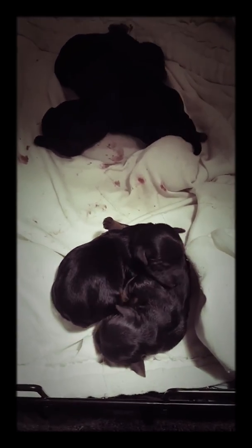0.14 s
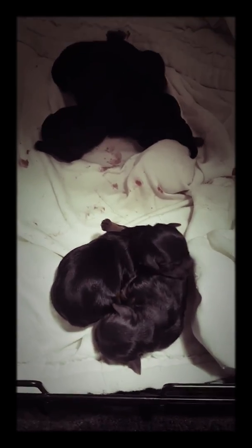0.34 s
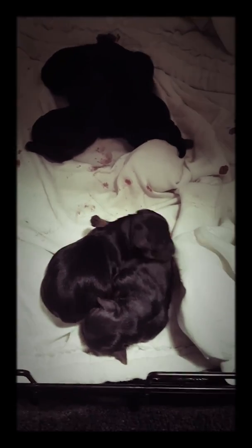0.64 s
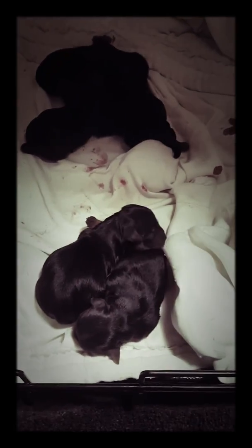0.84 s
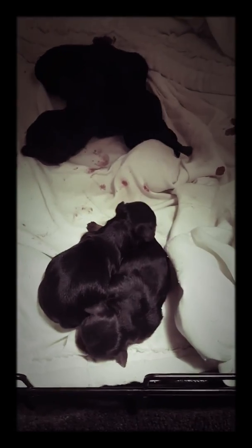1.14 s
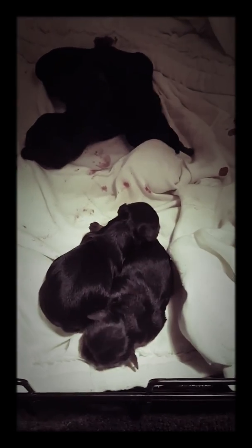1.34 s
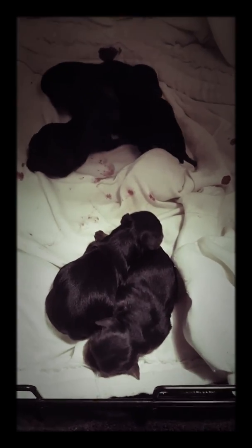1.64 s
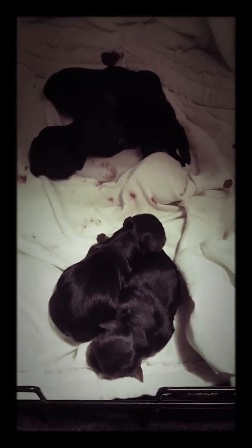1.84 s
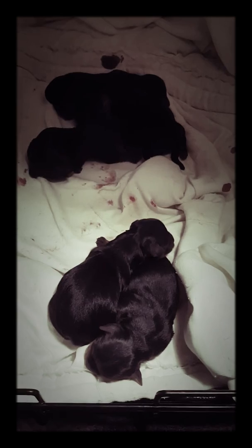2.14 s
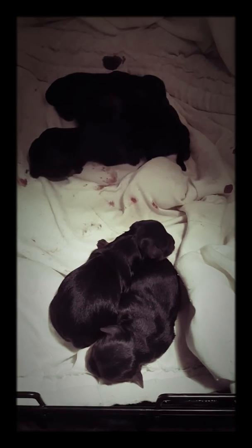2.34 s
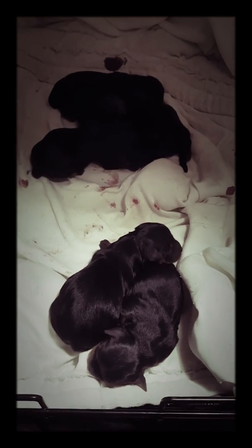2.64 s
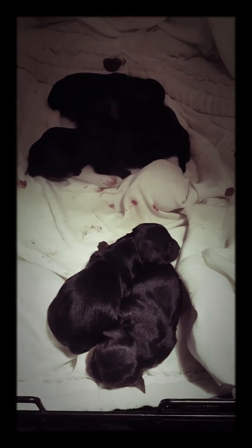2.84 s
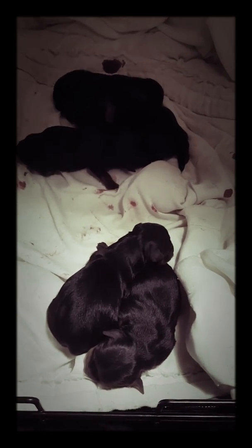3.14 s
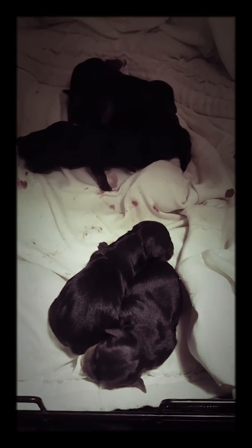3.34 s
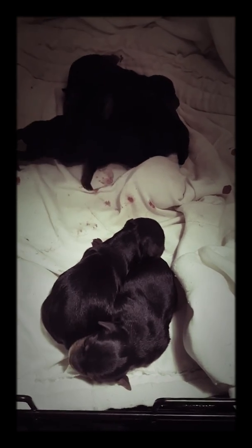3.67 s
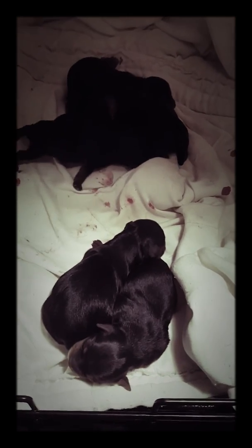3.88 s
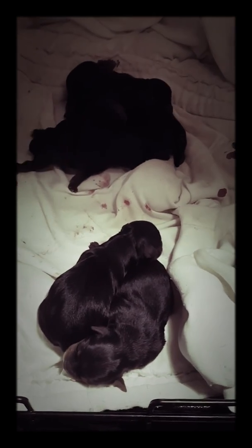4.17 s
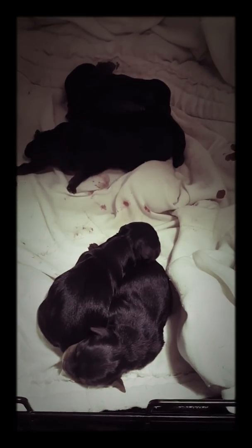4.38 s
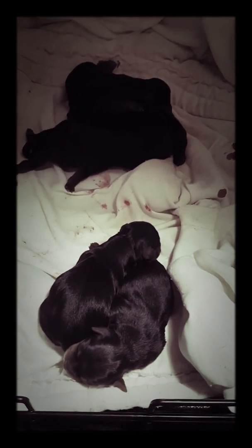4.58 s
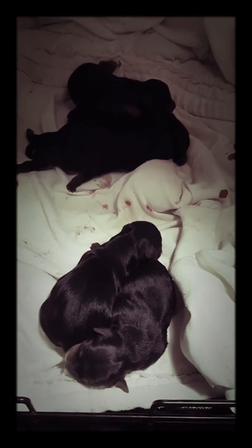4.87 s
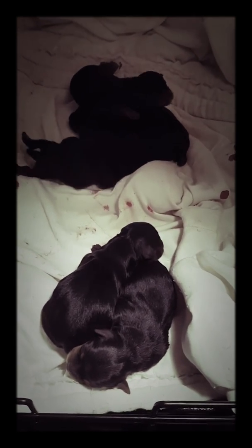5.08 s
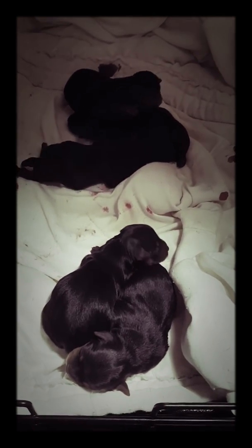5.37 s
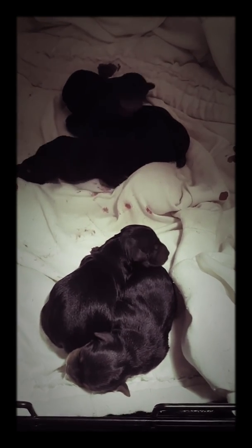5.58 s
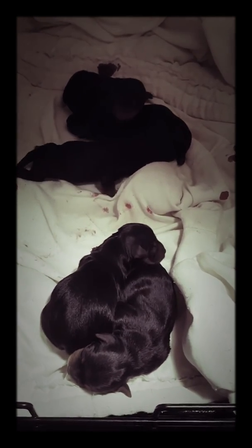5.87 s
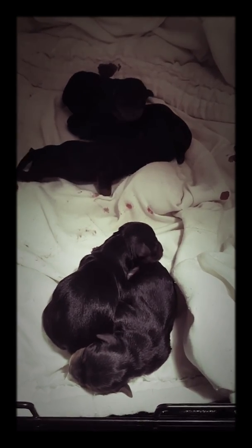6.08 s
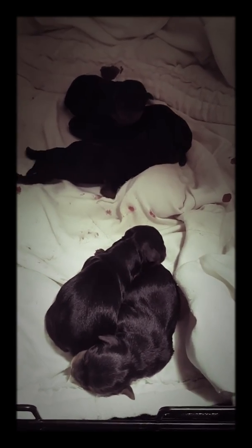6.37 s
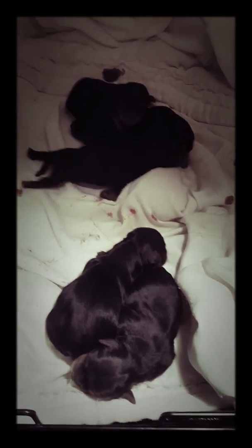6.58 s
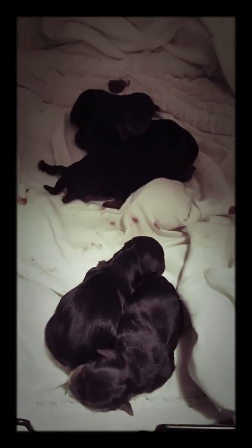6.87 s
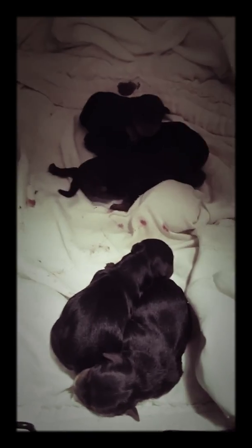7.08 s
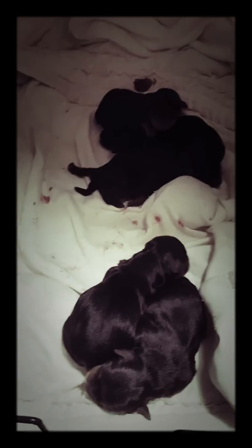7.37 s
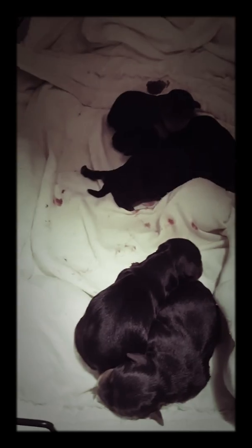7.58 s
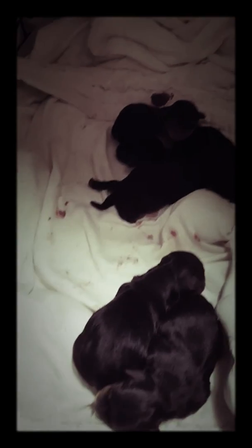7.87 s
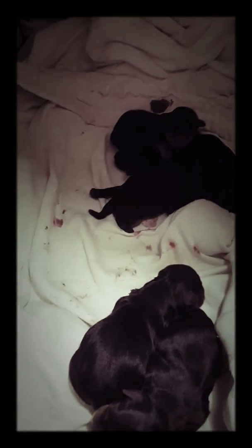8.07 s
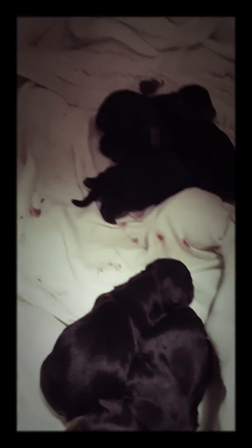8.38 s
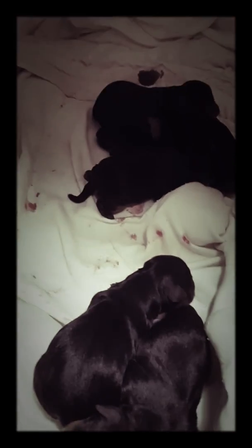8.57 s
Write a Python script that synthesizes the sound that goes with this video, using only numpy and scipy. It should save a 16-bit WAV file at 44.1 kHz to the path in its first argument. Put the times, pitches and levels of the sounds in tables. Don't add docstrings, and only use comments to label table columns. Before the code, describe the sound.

Newborn puppies squeak and whine in short, high, wavering cries that crack and rasp, with small handling bumps over faint hum and hiss.

```python
import sys
import numpy as np
from scipy import signal
from scipy.fft import rfft, irfft
from scipy.io import wavfile
from scipy.ndimage import uniform_filter1d

SR = 44100
rng = np.random.default_rng(int(sys.argv[2]) if len(sys.argv) > 2 else 0)


def store_pcm(level_fs):
    pcm = np.round(np.clip(level_fs, -1, 1) * 32767).astype(np.int16)
    wavfile.write(sys.argv[1], SR, np.atleast_2d(pcm).T)


def ratio_of_db(decibels):
    return 10 ** (np.asarray(decibels, float) / 20)


N = 384552
T = np.arange(N) / SR


def band(x, hz, width):
    return signal.lfilter(*signal.iirpeak(hz, hz / width, SR), x)


def band_twice(x, hz, width):
    return band(band(x, hz, width), hz, 2 * width)


def level(x, db):
    return x * ratio_of_db(db) / np.sqrt(np.mean(x ** 2))


def walk(rate):
    hold = int(SR / rate)
    held = np.repeat(rng.standard_normal(N // hold + 1), hold)
    return uniform_filter1d(held, hold)[:N]


def swells(rows):
    return sum(ratio_of_db(db) * np.exp(-np.maximum((s - T) / rise, (T - s) / fall)) for s, rise, fall, db in rows)


def cry(rows, fall_db, half_db, snap_db, open_db, wobble):
    # frequency in Hz, gain in dB.
    mouth = [(250, -35.5), (550, -5.5), (850, 0), (1200, 3), (1700, 2.5), (2400, -5), (3200, -10),
             (4400, -28)]
    # time in seconds, lift in dB, depth of the dip in dB.
    gape = [(0.4, 8, 1), (0.9, 14, 5.5), (2.3, 15, 1), (4.7, 3, -1.5), (8, 5, 8)]
    pops_s = np.array([2.657, 7.082, 7.768, 8.407])
    pop_lift, pop_settle_s, same_cry_s = 0.373, 0.00282, 0.02
    dip_hz, dip_width_hz = 1920, 200
    edge_s = 0.0011

    s, *columns = np.transpose(rows)
    start, end = s[0], s[-1] + edge_s
    i = slice(int(start * SR), int(end * SR))
    hz, effort = (np.interp(T[i], s, column) for column in columns)

    slew = max(min(300, len(hz) // 4), len(hz) // 32)
    for _ in range(2):
        hz = uniform_filter1d(hz, size=slew, mode="nearest")
    pops = np.abs(np.array(pops_s) - start).min() < same_cry_s
    hz = hz * (1 + pop_lift * np.exp((start - T[i]) / pop_settle_s) * pops)
    uneven = min(ratio_of_db(half_db), 1)
    shake = (0.0081 + 0.059 * uneven) * wobble[0, i]
    phase = 2 * np.pi * np.cumsum(hz * (1 + shake)) / SR

    k = np.arange(1, 18)[:, None]
    khz = k * hz / 1000
    mouth_hz, mouth_db = np.transpose(mouth)
    db = np.clip(fall_db * (k - 1), -24, 4 * abs(fall_db))
    db = db + snap_db * ((k == 2) + 0.11 * (k == 4)) + open_db * (k > 2)
    db = db + np.interp(np.log(k * hz), np.log(mouth_hz), mouth_db)
    at, lift, loss = np.transpose(gape)
    db = db - np.interp(start, at, loss) * np.exp(-((k * hz - dip_hz) / dip_width_hz) ** 2)
    db = db + 2.1 * start * np.exp(-(khz - 6.7) ** 2)
    db = db + (k > 1) * np.interp(start, at, lift) * np.exp(-((khz - 4.4) / 0.62) ** 2)
    db = db - 23 * (np.clip(khz - 4.75, 0, 0.9) + np.maximum(khz - 7.3, 0))
    db = db + effort - 10 * np.log10(np.sum(ratio_of_db(2 * db), axis=0))

    halves = np.maximum(db, np.vstack([db[:1] - 20, db[:-1]])) + half_db
    halves[0] -= 14
    flutter = ratio_of_db((3.5 + 6.5 * uneven) * np.tanh(wobble[1 + k[:, 0] % 3, i]))
    lines = ratio_of_db(db) * np.cos(k * phase) + ratio_of_db(halves) * np.cos((k - 0.5) * phase)
    tone = -np.sum(flutter * lines, axis=0)
    edge = np.clip(np.minimum(T[i] - start, end - T[i]) / edge_s, 0, 1)
    return i, np.sqrt(2) * tone * np.sin(edge * np.pi / 2) ** 2, effort


def voices():
    # time in seconds, pitch in Hz, effort in dB.
    cries_1 = [
        [(0.15, 981, -37.5), (0.221, 1557, -33), (0.267, 1573, -39.5)],
        [(0.267, 1438, -44), (0.31, 992, -46.5)],
        [(0.31, 559, -47), (0.385, 705, -41)],
        [(0.385, 792, -36), (0.414, 843, -45)],
        [(0.414, 537, -44.5), (0.47, 513, -55), (0.49, 573, -48), (0.535, 474, -68.5)],
        [(0.79, 871, -43.5), (0.842, 1523, -35), (0.885, 1870, -32.5), (0.905, 1965, -38.5),
         (0.925, 1777, -36.5), (0.95, 1300, -44), (0.974, 900, -40.5), (0.995, 650, -44.5), (1.013, 526, -45.5)],
        [(1.013, 527, -47), (1.058, 595, -45), (1.127, 543, -43.5), (1.21, 768, -47.5), (1.25, 722, -48),
         (1.307, 796, -42.5), (1.342, 705, -45)],
        [(1.742, 547.4, -47), (1.852, 742, -45)],
        [(1.852, 612, -36), (1.91, 615, -73.5)],
        [(0.8, 610, -43), (0.835, 730, -41)],
    ]
    cries_2 = [
        [(2.185, 842, -43.5), (2.198, 941, -43.5), (2.216, 1115, -32.5), (2.255, 1300, -33),
         (2.275, 1519, -35.5), (2.302, 1595, -31)],
        [(2.302, 1178, -29), (2.329, 1120, -37), (2.377, 816, -36), (2.41, 783, -60.5)],
        [(2.657, 1170, -38), (2.705, 1161, -34.5), (2.735, 1045, -47)],
        [(2.67, 638, -52.5), (2.725, 711, -47), (2.778, 1170, -33), (2.828, 1294, -30)],
        [(2.828, 1533, -34.5), (2.855, 1480, -30)],
        [(2.855, 1134, -32), (2.89, 1142, -30.5), (2.925, 827, -44)],
        [(3.215, 682, -53), (3.26, 808, -40), (3.341, 1483, -29), (3.38, 1565, -33.5), (3.422, 1506, -35),
         (3.44, 1026, -35), (3.482, 886, -32), (3.518, 692, -53.5)],
        [(3.345, 821, -46), (3.41, 383, -52)],
    ]
    cries_3 = [
        [(3.775, 590, -42.5), (3.892, 951, -35.5), (4.009, 755, -35), (4.078, 964, -35), (4.123, 1051, -40),
         (4.198, 919, -36.5), (4.245, 960, -37), (4.279, 942, -32), (4.3, 782, -53.5)],
        [(4.53, 779, -44), (4.565, 806, -41), (4.658, 1376, -33.5)],
        [(4.658, 1622, -35), (4.708, 1505, -35.5)],
        [(4.708, 1240, -37), (4.746, 1026, -40.5), (4.8, 914, -39), (4.885, 985, -41.5), (4.925, 863, -39.5),
         (4.96, 745, -40), (4.986, 732, -41), (5.02, 610, -42.5), (5.053, 540, -43.5)],
        [(4.88, 1108, -36.5), (4.897, 1390, -39.5), (4.915, 1100, -41.5)],
        [(5.31, 756, -52), (5.331, 1297, -35), (5.34, 1111, -36.5), (5.393, 1335, -33.5)],
        [(5.393, 1645, -31), (5.456, 1962, -44), (5.489, 1680, -38), (5.516, 1060, -41)],
        [(5.62, 733, -41), (5.673, 553, -35.5), (5.715, 718, -36), (5.75, 634, -59.5)],
        [(5.425, 654, -42.5), (5.46, 960, -53.5)],
        [(5.305, 2195, -48.5), (5.39, 1266, -47.5)],
    ]
    cries_4 = [
        [(5.972, 748, -55.5), (5.984, 1162, -40.5), (5.993, 1184, -34.5), (6.048, 1342, -35)],
        [(6.048, 1630, -27.5), (6.111, 1743, -31), (6.14, 1127, -38), (6.153, 1107, -39)],
        [(6.153, 499, -42.5), (6.19, 391, -40.5), (6.234, 373, -37)],
        [(6.236, 684, -38), (6.28, 539, -38.5), (6.322, 472.5, -41), (6.352, 455, -41.5), (6.382, 634, -36),
         (6.43, 775, -56)],
        [(6.587, 1060, -42), (6.595, 1030, -43), (6.623, 988, -47)],
        [(6.785, 520, -50), (6.82, 621, -47), (6.835, 801, -46.5), (6.875, 790, -64)],
        [(7.082, 1132, -42), (7.139, 1200, -34), (7.18, 1070, -42.5), (7.216, 860, -44)],
    ]
    cries_5 = [
        [(7.768, 1054, -39), (7.824, 1216, -31), (7.841, 1120, -32.5), (7.898, 1390, -37.5)],
        [(7.898, 1610, -37), (7.938, 1608, -34.5)],
        [(7.938, 1262, -35.5), (7.982, 1054, -39)],
        [(8.188, 650, -37), (8.215, 810, -56)],
        [(8.407, 1040, -40), (8.451, 1200, -34.5), (8.474, 1448, -41), (8.494, 1032, -36), (8.513, 1020, -42.5)],
        [(8.513, 910, -41), (8.564, 664, -44)],
        [(8.564, 599, -49), (8.594, 456.5, -45.5), (8.609, 492, -44.5), (8.627, 794, -40), (8.665, 730, -59)],
    ]
    cries_6 = [
        [(5.779, 1720, -44), (5.796, 1700, -44)],
        [(5.796, 684, -43.5), (5.822, 780, -43.5)],
        [(4.708, 1855, -45), (4.746, 1535, -44.5), (4.8, 1390, -57)],
        [(6.645, 620, -51), (6.676, 429, -48), (6.695, 405, -51.5)],
    ]
    cries_7 = [
        [(5.516, 475, -44.5), (5.54, 423.6, -38.5), (5.62, 366.4, -37.5)],
        [(6.075, 658, -47.5), (6.15, 510, -44)],
        [(6.234, 710, -39.5), (6.262, 1020, -45)],
        [(5.827, 2500, -33.5), (5.838, 1310, -52.5)],
        [(5.855, 738, -45.5), (5.88, 867, -51.5)],
        [(3.248, 1517, -52), (3.28, 1563, -42), (3.295, 1200, -39.5), (3.362, 1080, -57)],
        [(0.278, 939, -43), (0.3, 867, -37.5), (0.348, 895, -44)],
        [(0.235, 790, -39), (0.262, 780, -41)],
        [(0.766, 1250, -50.5), (0.798, 809, -49)],
        [(7.785, 712, -51), (7.83, 1220, -39)],
        [(7.862, 1010, -42), (7.9, 837, -48.5)],
        [(6.738, 402, -46), (6.785, 530, -52.5)],
        [(1.342, 607, -40), (1.356, 690, -43), (1.385, 593, -56.5)],
        [(7.255, 543, -55), (7.33, 452, -48.5)],
    ]
    cries_8 = [
        [(5.053, 493, -43.5), (5.066, 727, -44.5), (5.08, 920, -57.5)],
        [(4.862, 1750, -45), (4.882, 1764, -43)],
        [(7.216, 620, -46.5), (7.258, 575, -48.5)],
        [(7.258, 589.6, -46.5), (7.3, 872, -40.5), (7.332, 1090, -35.5), (7.371, 1207, -32), (7.431, 1018, -37),
         (7.49, 639.5, -36), (7.55, 673, -46.5)],
        [(7.982, 997, -45), (8, 800, -46), (8.022, 746, -41), (8.06, 593, -44.5), (8.165, 447, -44),
         (8.188, 490, -44)],
        [(7.972, 533, -44), (8.025, 359, -46)],
    ]
    # fall per harmonic in dB, half-pitch
    # lines in dB, rasp under the tone in dB.
    fold_manners = [(1, -20, -19), (-2, -5, 0.5), (-1, -7.5, 2), (-1.5, -10.5, -20), (-4, -9.5, -8),
                    (4.5, -46, -37), (2.5, -45, -27), (-1.5, -14.5, -6), (-6.5, -15, -12), (-11.5, -46, -23),
                    (-5.5, -28, -19), (-7, -27, -34), (6.5, -21.5, -20.5), (-4, -40, -25), (2, -43, -35),
                    (-4, -33.5, -22.5), (-1, -27, -30), (-0.5, -13.5, -23),
                    (-3, -46, -37.5), (-2.5, -31.5, -46), (0.5, -33, -40), (0, -29, -26), (0, -24.5, -18),
                  (0, -29, -29.5), (-3, -30, -27), (-4, -29, -31), (-6.5, -19, -34), (2, -11, -33),
                  (-4, -25, -22), (-10, -27.5, -32), (0.5, -25, -8.5), (-2.5, -30, -21), (-2.5, -33, -15),
                  (-12, -9, -20), (-2, -26, -19), (-4.5, -45, -14), (-7, -15.5, -18.5), (0, -27, -19.5),
                  (-19.5, -5, -19), (-3.5, -42, -18.5), (-2, -29, -7), (-5, -40, -15),
                    (3, -32, -14.5), (1, -8.5, -6), (-14, -28, -31.5), (-0.5, -36, -8),
                    (-2, -29.5, -26), (2, -26, -28.5), (-1.5, -35, -18), (-14, -37, -28), (1.5, -12.5, -0.5),
                (4.5, -24, -19), (2, -10.5, -16.5), (-0.5, -22, -21), (3.5, -27, -10.5), (-4, -32, -21.5),
                (-12.5, -30, -27), (-0.5, -42, -24), (0.5, -25, -8.5), (-2.5, -30, -26)]
    # the same three, second harmonic lift in dB, upper harmonics lift in dB.
    voices_8 = [(-1.5, -15, -11, 4, 0.5), (-10, -30, -20, 0, 0), (-2.5, -10, -2.5, -2, -1),
                (-5, -45, -16.5, 1, -2), (-2, -23, -13, 1.5, 0), (-6, -31, -21, -9, 15.5)]
    snap_1_6_db = [11, 7, -6, -1.5, 3, 8.5, -3, -0.5, 3, 6.5, 4.5, 6, 8.5, -0.5, -6, -2, 4.5, -4, 3.5, 4.5,
                   5, 2.5, 11, -3, 1.5, 8, -2, 5, 5, 1.5, -2, 4.5, -1, 0.5, 4, 5, 5.5, -3.5, 0.5, 5.5,
                   -10.5, -3.5, 5, -10.5, 3, 3]
    snap_7_db = [3.5, -6.5, 1, -5, -0.5, 8.5, 17, -4, 12, -3, -7.5, -3.5, -0.5, -6]
    open_mouth_db = [2, -1, -2.5, 3, 5, -2.5, 1.5, 1, 2, 0, -2, -3, -2, -2.5, -1.5, -5, 2, -2, 3.5, 4.5, 1,
                     1, 1, -2, -11, 9.5, 1, 4, 3.5, 5, 0, 6, 15.5, 3.5, 0, 5.5, 1, 2, -4, 5.5, -0.5, -1, 0,
                     8, 3, 1, 11.5, 2.5, 9, 0, 4, 3, 0, 20, 0, 4, 0, -9.5, 0, -10]
    # start and end in seconds, first and last level in dB.
    breaths = [(0.098, 0.15, -47, -50), (0.765, 0.8, -54, -48), (5.773, 5.79, -45.5, -49),
               (5.835, 5.848, -43, -46), (5.899, 5.987, -58, -48), (6.568, 6.588, -47, -41.5),
               (6.621, 6.65, -46, -49), (2.151, 2.195, -56, -53)]
    # peak, rise and fall in seconds, level in dB.
    catches = [(2.66, 0.0054, 0.0091, -38), (4.086, 0.006, 0.022, -39.5), (4.912, 0.04, 0.025, -48),
               (5.428, 0.023, 0.017, -41.5), (7.375, 0.062, 0.01, -39), (3.8, .004, .006, -47.5),
               (3.284, 0.012, 0.023, -45.5)]
    rasp_fade_s = 0.01

    cries = cries_1 + cries_2 + cries_3 + cries_4 + cries_5 + cries_6 + cries_7 + cries_8
    manners = fold_manners
    colours = [(*v, s, o) for v, s, o in zip(manners, snap_1_6_db + snap_7_db, open_mouth_db)] + voices_8
    tones, hoarse = np.zeros(N), np.zeros(N)
    wobble = np.array([walk(150), walk(50), walk(45), walk(55)])
    for rows, (fall_db, half_db, rasp_db, snap_db, open_db) in zip(cries, colours):
        i, tone, effort = cry(rows, fall_db, half_db, snap_db, open_db, wobble)
        tones[i] += tone
        hoarse[i] += ratio_of_db(effort + rasp_db)

    alone = swells(catches)
    for start, end, first_db, last_db in breaths:
        alone += ratio_of_db(np.interp(T, [start, end], [first_db, last_db])) * (T >= start) * (T < end)
    keep = np.exp(-1 / (rasp_fade_s * SR))
    efforts = np.array([hoarse, alone])
    hoarse, alone = np.maximum(efforts, signal.lfilter([1 - keep], [1, -keep], efforts))
    return tones, hoarse, alone


def rasp(hoarse, scale, whistle_db):
    # centre in Hz, width in Hz, gain in dB.
    throat_rings = [(870, 450, 3.5), (1630, 1420, 11.5), (2110, 210, -3.5), (4000, 1800, -17.5)]
    cycles = np.cumsum(400 * (1 + 0.25 * walk(30) + 0.07 * walk(250))) / SR
    slaps = level(np.diff(cycles % 1, prepend=0), 0) * ratio_of_db(5.1 * np.tanh(walk(300)))
    air = (slaps + 1.1 * rng.standard_normal((2, N))) * ratio_of_db(2 * walk(40))
    throat = sum(ratio_of_db(db) * band_twice(air, hz * scale, width) for hz, width, db in throat_rings)
    throat = signal.sosfilt(signal.butter(8, 4400, fs=SR, output="sos"), throat)
    whistle = level(band(band(air, 6400, 2500), 6400, 2500), whistle_db)
    return level(level(throat, 0) + whistle, 0) * hoarse


def creaks():
    # time in seconds, level in dB.
    lone_slaps = [(0.0873, -37.5), (.095, -43), (0.1, -46), (2.747, -32), (2.773, -38), (5.773, -44),
                  (5.821, -38.5), (5.883, -48), (5.897, -40), (5.91, -45), (5.915, -41.5), (5.924, -49),
                  (6.6943, -39.5), (6.7033, -41), (6.714, -45), (6.7182, -40), (6.725, -40), (6.7314, -39)]
    # centre in Hz, width in Hz, gain in dB.
    creak_rings = [(1200, 360, 1), (2500, 670, 0), (3500, 370, -18)]
    kicks = np.zeros(N)
    for s, db in lone_slaps:
        kicks[int(s * SR)] = -ratio_of_db(db + 26)
    return sum(ratio_of_db(db) * band_twice(kicks, hz, width) for hz, width, db in creak_rings)


def grunt():
    # time in seconds, pitch in Hz, level in dB.
    glide = [
        (1.512, 215.7, -50),
        (1.74, 232.2, -51),
        (1.78, 230, -70),
    ]
    # centre in Hz, width in Hz, gain in dB.
    grunt_rings = [(780, 300, 3), (1300, 480, -1.5), (2230, 420, -6), (3550, 280, -6.5)]
    s, hz, db = np.transpose(glide)
    cycles = np.cumsum(np.interp(T, s, hz) * (1 + 0.015 * walk(60))) / SR
    slaps = level(np.diff(cycles % 1, prepend=0), 0) * ratio_of_db(2.3 * walk(200))
    source = slaps + 0.94 * rng.standard_normal((2, N))
    throat = sum(ratio_of_db(ring_db) * band_twice(source, f, width) for f, width, ring_db in grunt_rings)
    return level(throat, 0) * ratio_of_db(np.interp(T, s, db)) * (T > s[0]) * (T < s[-1])


def handling():
    # time in seconds, peak level in dB, ring in Hz.
    bumps = [(0.902, -44.5, 300), (1.834, -24.5, 444), (2.022, -41, 400), (2.267, -36, 230),
             (2.422, -26, 248), (2.436, -28.5, 91), (2.462, -36.5, 124), (3.585, -46, 434),
             (4.053, -32.5, 407), (4.189, -45.5, 247), (6.941, -41, 614), (7.334, -39, 342),
             (7.447, -34.5, 234), (7.737, -30.5, 428), (7.8556, -12.5, 970), (7.858, -33.5, 121),
             (8.349, -47, 283)]
    # peak, rise and fall in seconds, level in dB.
    rustles = [
        (4.1, 0.0036, 0.0064, -53),
        (4.415, 0.006, 0.009, -62.5),
        (7.009, 0.018, 0.077, -67),
        (8, 0.11, 0.15, -67),
    ]
    grips = [
        (2.45, 0.02, 0.08, -47.5),
        (2.32, 0.089, 0.044, -58),
        (7.72, 0.044, 0.02, -48.5),
        (6.5, 0.11, 0.64, -59.5),
    ]
    scuffs = [(3.585, 0.0021, 0.0057, -56.5), (3.632, .002, 0.0093, -63), (7.755, .01, .01, -58.5),
              (7.012, 0.029, 0.04, -36.5), (7.205, 0.062, 0.019, -44), (7.406, 0.0022, 0.0081, -43.5),
              (7.565, 0.012, 0.011, -53.5), (7.588, 0.0036, .008, -54.5), (7.645, .02, 0.018, -57),
              (7.7, 0.0027, .005, -57), (7.715, .003, 0.0066, -53), (7.738, 0.0022, 0.0059, -47.5)]
    nail = [(7.858, 0.012, 0.0013, -29)]

    out = np.zeros((2, N))
    lean_each = np.clip(rng.uniform(-1.05, 0.89, len(bumps)), -1, 1)
    for (s, db, hz), lean in zip(bumps, lean_each):
        age = np.maximum(T - s - np.array([[0], [0.0005]]), 0) * hz
        ring = 2 * np.sin(2 * np.pi * age) * np.exp(-age / 0.55)
        out -= ratio_of_db(db) * np.array([[1 + lean], [1 - lean]]) * ring
    grain = rng.standard_normal((2, N)) * ratio_of_db(2.2 * walk(900))
    scratch = level(band(band(grain, 3700, 4000), 4500, 6000), 0)
    scrape = level(band(band(grain, 200, 220), 200, 400), 0)
    scuff = level(band(band(grain, 1500, 2000), 1550, 2700), 0)
    cloth = level(band(grain, 4400, 1500), 0) + level(band(grain, 14000, 5000), -9.5)
    out += scratch * swells(nail) * np.array([[0.4], [1.6]])
    out += scrape * swells(grips) + scuff * swells(scuffs)
    out = signal.sosfilt(signal.butter(2, 60, "high", fs=SR, output="sos"), out)
    return out + cloth * swells(rustles) * np.array([[0.7], [1.3]])


def two_ports(pups):
    turn = np.interp(T, [0, 8.7], [1.15, 0.85])
    pups[1] = np.real(signal.hilbert(pups[1]) * np.exp(-1j * turn))
    late = np.arange(N) - np.interp(T, [0, 8.7], [4.5, 1.2])
    pups[1] = np.interp(late, np.arange(N), pups[1])
    shade = np.interp(T, [0, 2.3, 6.5, 7.8], [0.43, 0.32, 0.25, -0.032]) * band(pups, 1150, 1300)
    shade = shade - 0.38 * band(pups, 4670, 6400)
    return pups + shade * np.array([[1], [-1]])


def room(pups):
    age = T[:12000]
    tail = band(rng.standard_normal((2, len(age))), 600, 1100) * ratio_of_db(-60 * age / 0.19) * (age > 0.004)
    return signal.fftconvolve(pups, tail / np.sqrt(np.sum(tail[0] ** 2)), axes=1)[:, :N]


def background():
    # frequency in Hz, level in dB per Hz.
    hiss_shape = [(25, 3), (100, 4.5), (250, 1), (500, -7), (1000, -8), (2000, -13), (4000, -20.5),
                  (6300, -22.5), (9500, -29.5), (13000, -22.5)]
    hum_hz, hum_db, hiss_db = 59.9, -56.5, -60.5
    hz = np.arange(N // 2 + 1) * SR / N + 1
    shared, left, right = rfft(rng.standard_normal((3, N)))
    like = 1 / (1 + (hz / 160) ** 1.1)
    floor_hz, floor_db = np.transpose(hiss_shape)
    shape = ratio_of_db(np.interp(np.log(hz), np.log(floor_hz), floor_db))
    hiss = irfft(shape * (np.sqrt(like) * shared + np.sqrt(1 - like) * np.array([left, right])), N)
    phase = 2 * np.pi * np.cumsum(hum_hz + 1.24 * walk(2.3)) / SR
    hum = np.sin(phase) + ratio_of_db(-15.0) * np.sin(2 * phase)
    return level(hiss, hiss_db) * ratio_of_db(1.6 * walk(8.6)) + level(hum, hum_db) * ratio_of_db(np.array([[-0.7], [0.7]]))


def scene():
    tone, hoarse, alone = voices()
    pups = tone + creaks() + grunt()
    pups = pups + rasp(hoarse, 0.8, whistle_db=-30) + rasp(alone, 0.99, whistle_db=-23.5)
    pups = two_ports(pups)
    near = pups + ratio_of_db(-22.5) * room(pups) + handling()
    return near - 0.7 * band(near, 8850, 3600) + background()


def roll_off(x):
    return signal.sosfilt(signal.butter(12, 15750, fs=SR, output="sos"), x)


def record(dry):
    return roll_off(dry)


dry = scene()
out = record(dry)
store_pcm(out)
```